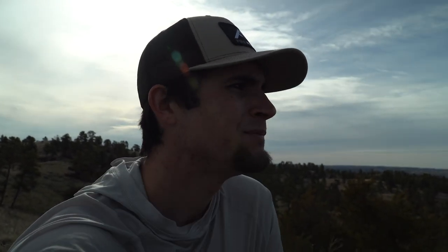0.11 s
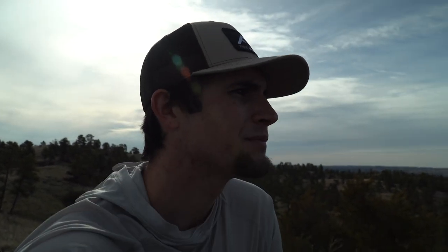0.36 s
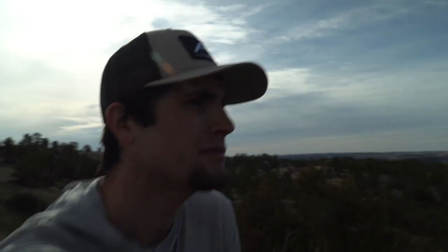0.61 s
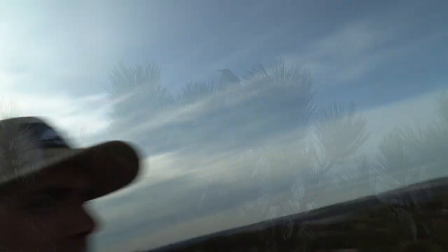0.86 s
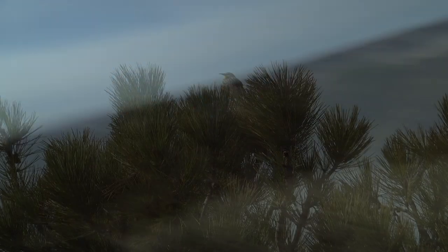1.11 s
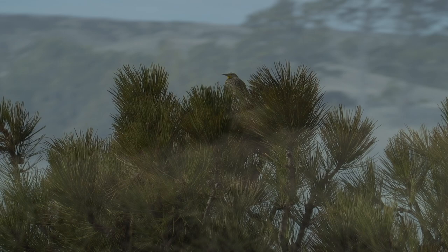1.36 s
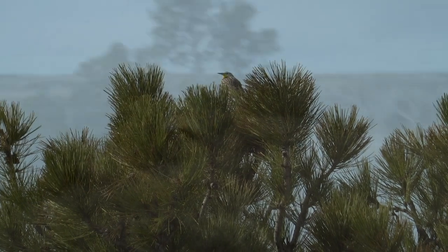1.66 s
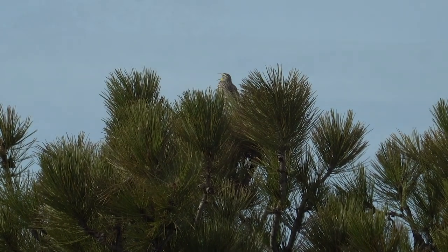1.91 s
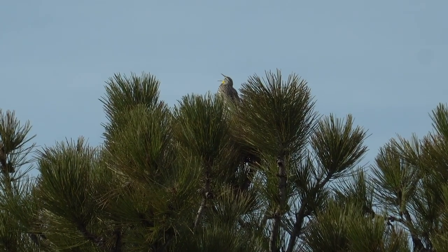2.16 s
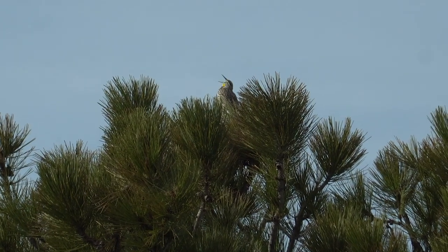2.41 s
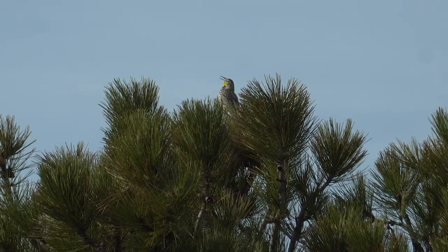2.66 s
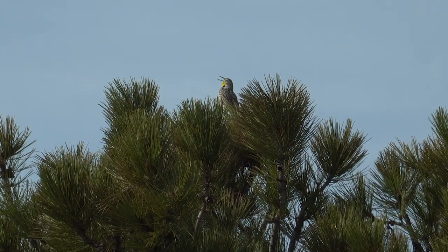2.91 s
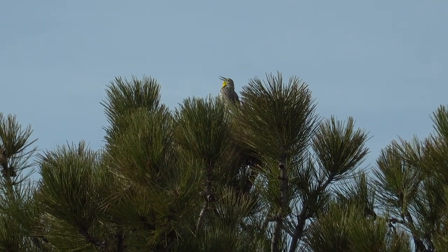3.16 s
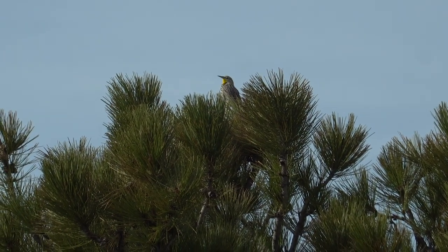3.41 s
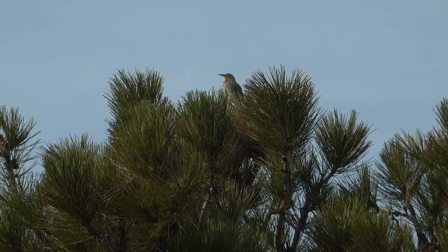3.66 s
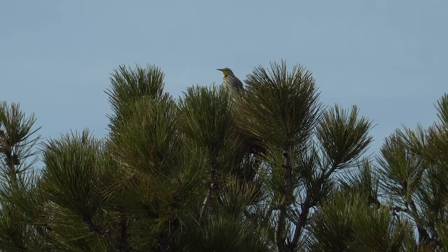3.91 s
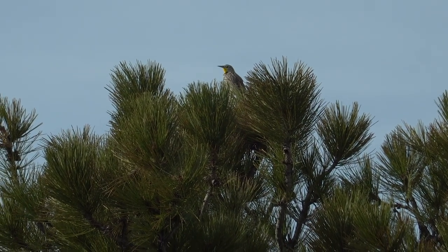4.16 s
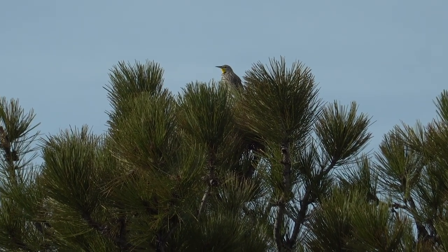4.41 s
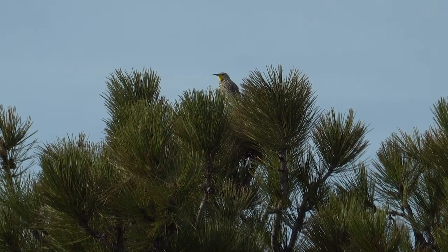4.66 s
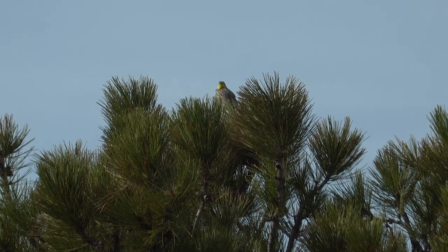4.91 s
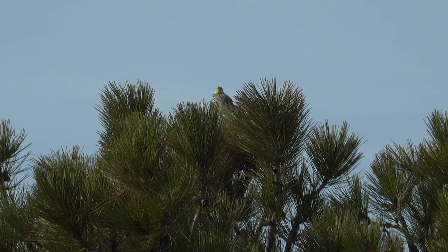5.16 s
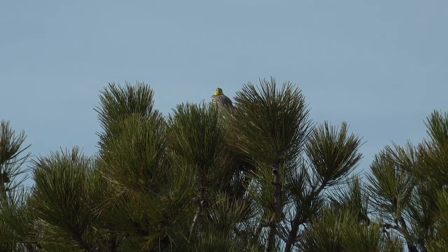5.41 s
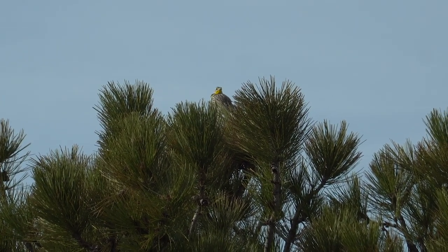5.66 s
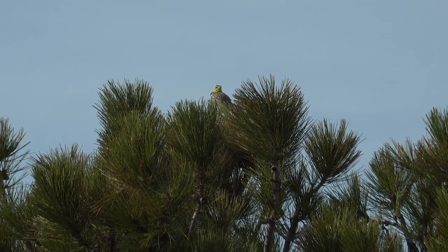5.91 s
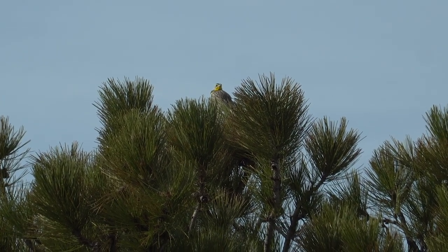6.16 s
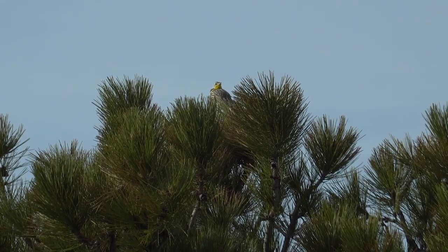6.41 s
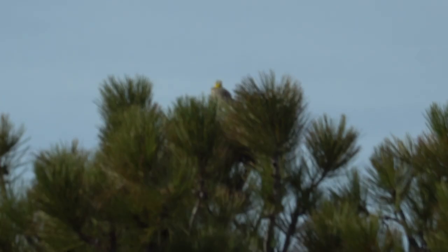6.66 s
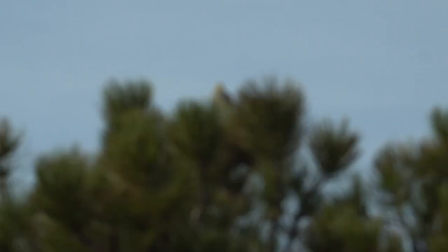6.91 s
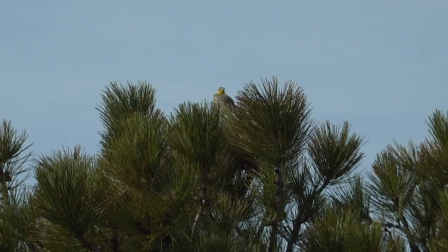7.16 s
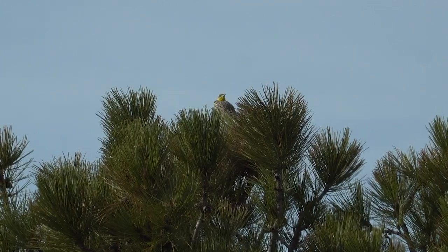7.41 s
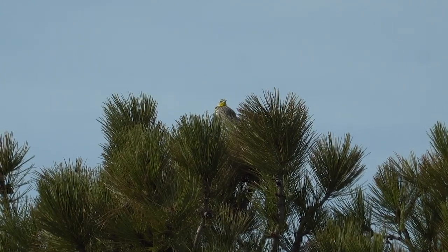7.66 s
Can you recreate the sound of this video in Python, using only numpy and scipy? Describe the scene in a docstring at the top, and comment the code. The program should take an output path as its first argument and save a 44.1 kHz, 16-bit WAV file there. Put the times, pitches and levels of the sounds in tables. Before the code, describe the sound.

Outdoors in open pine country, cloth swishes close to a hand-held microphone, which is shoved with a low thump and rattle. A hard cut brings a quieter scene. Around two seconds a nearby meadowlark sings a single clear, fluting phrase, ending in gurgling, tumbling notes. Afterwards only faint distant whistles and chirps remain, trailing soft echoes, with light wind rumble, thin air hush and a few tiny ticks and knocks.

```python
"""Meadowlark in open country

A lark near by sings one fluting phrase: near-sine notes with weak partials that gurgle and tumble. Far
birds, gliding sines, whistle behind it and trail echoes of noise. Wind and air are coloured noise. In a
short first scene cloth swishes (grainy noise) and the hand-held recorder is shoved (dying sines and a
rattle); a hard cut leads to a quieter second scene. A few small knocks and ticks ring close by.
"""
import sys
import numpy as np
from scipy import signal
from scipy.fft import rfft, irfft
from scipy.io import wavfile
from scipy.ndimage import uniform_filter1d

SR = 44100
rng = np.random.default_rng(int(sys.argv[2]) if len(sys.argv) > 2 else 0)


def generate_wav(sig):
    """Save sig (samples, or channels by samples) to the path in sys.argv[1] as 16-bit PCM at SR."""
    pcm = np.round(np.clip(np.atleast_2d(sig).T, -1, 1) * 32767).astype(np.int16)
    wavfile.write(sys.argv[1], SR, pcm)


def amplitude_ratio(level_db):
    """Convert a level in decibels to the matching linear amplitude (field) ratio."""
    exponent = np.asarray(level_db, float) / 20
    return 10 ** exponent


N = 343980
T = np.arange(N) / SR   # time of every sample, s
CUT_S = .7657   # the first scene ends here

# rumble of the wind on the microphone: f/Hz, relative level per Hz/dB
WIND_COLOUR = [(3.5, -33), (6.0, 4), (22, 0.5), (38, -16.5), (54, -11), (70, -26), (200, -40.5), (260, -64)]
# strength of the wind, one list a scene: t/s, level/dB before a quick random drift
WIND_LEVEL = [
    [(0, -35), (.41, -35.5), (.76, -29)],
    [(.78, -39.5), (2.0, -38.5), (3.2, -46), (4.2, -42), (6.4, -41), (7.8, -45.5)],
]
# hush of the open air: f/Hz, relative level per Hz/dB
AIR_COLOUR = [(53, -32.5), (90, -7), (136, -5), (379, -8.5), (684, -12.5), (1340, -15.5), (2320, -14.5),
              (4360, -22.5), (15100, -27), (16500, -46)]
AIR_DB = -62.5   # before a slow random drift

# far larks, held notes: start/s, length/s, first f/Hz, last f/Hz, level/dB before fades and twinkle
HELD_NOTES = [(.462, 0.056, 2780, 2860, -56), (.535, 0.036, 2870, 2720, -55.5),
              (.53, 0.058, 1950, 2050, -59.5), (.655, 0.026, 2870, 2730, -50.5),
              (.88, 0.038, 2650, 2600, -61.5), (1.02, .066, 1610, 1276, -61.5),
              (1.162, 0.022, 1640, 1680, -55), (1.18, 0.031, 1950, 1930, -55.5),
              (1.21, 0.1, 2058, 1890, -61.5), (1.28, 0.082, 2120, 2027, -52),
              (1.468, 0.024, 2010, 1880, -56.5), (1.56, 0.1, 2150, 1950, -52.5),
              (1.82, .14, 2600, 2340, -48.5), (2.05, 0.06, 3310, 3110, -50.5),
              (2.185, 0.056, 1505, 1550, -59), (2.31, .056, 2280, 2083, -52),
              (2.51, 0.025, 2360, 2190, -48.5), (2.54, 0.078, 1560, 1585, -57),
              (3.49, 0.18, 2034, 2057, -60.5), (3.55, 0.071, 1950, 1777, -54),
              (3.76, 0.1, 3200, 3000, -61.5), (3.83, 0.084, 3720, 3500, -61),
              (3.87, 0.17, 3030, 2930, -66.5), (4.04, 0.027, 2680, 2510, -56.5),
              (4.145, 0.16, 3690, 3520, -68.5), (4.167, .022, 2700, 2480, -56),
              (4.265, 0.3, 2407, 2243, -62.5), (4.475, 0.14, 1600, 1550, -62),
              (4.58, .022, 2760, 2740, -62), (4.92, 0.018, 2460, 2450, -52.5),
              (4.95, .11, 3380, 3356, -57.5), (5.06, 0.089, 2810, 2660, -48.5),
              (5.15, .067, 2170, 2133, -48), (5.37, 0.096, 1783, 1707, -50), (5.44, 0.036, 1945, 2045, -54),
              (5.47, 0.079, 2806, 2590, -49.5), (5.72, .036, 3370, 3070, -58),
              (5.73, 0.112, 2355, 2200, -64), (5.886, 0.026, 2400, 2010, -51.5),
              (5.94, .05, 3900, 2900, -64), (6.05, .08, 1840, 1790, -67.5), (5.94, 0.22, 2036, 1950, -58),
              (6.238, 0.19, 2257, 2240, -50), (6.35, 0.072, 3200, 3000, -70.5),
              (6.52, 0.056, 1990, 1950, -56), (6.62, 0.24, 2580, 2475, -66), (6.63, 0.1, 2340, 2200, -66),
              (6.715, 0.139, 3040, 2716, -59), (7.29, 0.064, 1632, 1595, -63.5),
              (7.335, 0.042, 2535, 2530, -59), (7.44, 0.071, 3270, 3140, -69),
              (7.69, 0.075, 2340, 2196, -60.5)]
FADE_DB = 3.5   # a held note weakens by this much towards its end
# far larks, notes that hold and droop at the end: same columns
DROOPING_NOTES = [(6.45, 0.069, 2055, 1860, -52), (6.82, 0.053, 2150, 1778, -56.5),
                  (6.917, 0.026, 1786, 1550, -57.5), (6.97, .23, 3730, 2850, -69),
                  (7.01, 0.055, 2220, 1880, -58.5)]
# far larks, quick slurs: start/s, first f/Hz, last f/Hz, level/dB before fades and twinkle
QUICK_SLURS = [(.55, 2450, 2050, -41), (.783, 2710, 1700, -56), (1.147, 2600, 1700, -56.5),
               (1.315, 2490, 2800, -65), (1.705, 1420, 1750, -59), (2.119, 4100, 1973, -54.5),
               (2.419, 3560, 2100, -55.5), (2.691, 1601, 2290, -57.5), (2.77, 3270, 2040, -45.5),
               (3.5, 3370, 1990, -53), (3.69, 1830, 2430, -55), (3.731, 3440, 2230, -54.5),
               (3.93, 4050, 2080, -58.5), (4.05, 2446, 1850, -61), (4.074, 3220, 1900, -55),
               (4.097, 3660, 2500, -56), (4.122, 2350, 1500, -65), (4.163, 1800, 2140, -53),
               (4.198, 3070, 1880, -56), (4.335, 2100, 2500, -59.5), (4.4, 1704, 2250, -60),
               (4.46, 1346, 1623, -59.5), (5.655, 3214, 2255, -56.5), (5.845, 3040, 1600, -56.5),
               (6.145, 1550, 1850, -60), (6.165, 1150, 1550, -60), (6.22, 1150, 1600, -64.5),
               (6.745, 1610, 2150, -63), (6.745, 4220, 3770, -61), (7.285, 3700, 2050, -59),
               (7.56, 3600, 2050, -60)]
PLUNGE_HZ_PER_S, RISE_HZ_PER_S = 33000, 14000   # average pace of a slur
CHORUS_PER_S, CHORUS_DB = 45.0, -81   # faintest chirp of the second scene, before fades and twinkle
# a far bird repeats an arched chirp: first t/s, period/s, length/s, foot f/Hz, top f/Hz, level/dB before drift
ARCHED_CHIRP = (5.32, .1455, .044, 2150, 2920, -69)
# a small bird's thin rising whistle: t/s, f/Hz, level/dB, before small random wavers
THIN_NOTE = [(3.65, 6030, -85), (3.7, 6290, -77), (3.81, 6290, -81), (3.89, 7200, -69), (3.98, 7180, -71),
             (4.03, 8340, -84)]

# sound scattered back by trees and slopes: delay/s, level per 10 ms of delay/dB, before clumping
SCATTERED_ECHO = [(.004, -12), (.03, -34.5), (.08, -32), (.14, -34), (.21, -49), (.5, -61)]
VALLEY_T60_S, VALLEY_DB = 1.2, -25   # long echo of the far birds; dB per 10 ms of delay, at its start

# colour of rubbed cloth: f/Hz, relative level per Hz/dB
CLOTH_COLOUR = [(120, -14), (220, -2.5), (330, 0.5), (750, -5.5), (1300, -3), (3100, -3), (5000, -8.5),
                (9300, -9.5), (10000, -19.5), (13600, -12), (16000, -30)]
# strokes of cloth: peak t/s, level/dB, time for the body to fall 20 dB/s, sheen against the body/dB
CLOTH_STROKES = [(0.038, -36, 0.21, 0.5), (.315, -64, 0.1, 12), (.55, -55, 0.33, -11),
                 (.72, -57.5, 0.15, 7)]
SHEEN_STEEPER, STROKE_SHAPE = 1.7, 2.25   # the sheen dies faster than the body; a stroke holds, then lets go
# the hand shoves the recorder: t/s, level at the onset/dB, swing f/Hz
HAND_SHOVES = [(0.697, -14, 42), (0.7283, -12.5, 190), (.74, -13.5, 76), (.743, -10, 5.5), (.763, -18, 215)]
SHOVE_CYCLES = 5.7   # swings in which a shove dies by 60 dB
# knocks on the recorder body: t/s, level/dB, hardness (tilt towards the treble)/dB per octave
BODY_KNOCKS = [(.683, -40.5, 17.5), (1.255, -44, 3), (1.971, -45.5, -18.5), (3.786, -50.5, 2),
               (3.952, -45, 4), (7.097, -51, 7), (7.197, -45, 10)]
# ringing of the recorder body: f/Hz, level against the knock/dB, time to fall 60 dB/s
BODY_MODES = [(223, -3.5, 0.043), (426, -2, 0.042), (620, -6.5, 0.027), (853, -9.5, 0.016)]
# dry ticks: t/s, level/dB
DRY_TICKS = [(.682, -32.5), (2.59, -45), (2.743, -44.5), (3.939, -50.5), (5.308, -54), (5.317, -46.5),
             (5.339, -40), (5.384, -40), (6.802, -51.5), (7.759, -55)]
# ringing of a tick: f/Hz, level against the tick/dB before chance, time to fall 60 dB/s
TICK_RINGING = [(3500, -13.5, 0.0076), (6613, 3, 0.0044), (7670, -11.5, 0.0073), (12330, -19.5, 0.0054)]

# near lark, one list a whistled note: t/s, f/Hz, level/dB, both before gurgles and unsteady breath
SONG_NOTES = [
    [(1.96, 3850, -57), (1.982, 3955, -38), (2.041, 4593, -25), (2.062, 3830, -19.5), (2.071, 3750, -28)],
    [(2.243, 3530, -52), (2.271, 3510, -28.5), (2.299, 3582, -18.5), (2.334, 3628, -20),
     (2.358, 3830, -21.5), (2.369, 3892, -17.5), (2.398, 4007, -29.5), (2.408, 4030, -33)],
    [(2.498, 6660, -38.5), (2.507, 4130, -36.5)],
    [(2.516, 4560, -27), (2.53, 4770, -25.5), (2.541, 4763, -19), (2.561, 3860, -23), (2.572, 3730, -22)],
    [(2.613, 3590, -17), (2.631, 3410, -24), (2.652, 3318, -19.5), (2.71, 3012, -20), (2.75, 2832, -20),
     (2.764, 2854, -25.5)],
    [(2.828, 1680, -42), (2.843, 1832, -22.5), (2.869, 1936, -20)],
    [(2.881, 2584, -19), (2.902, 2470, -19), (2.907, 2340, -20), (2.938, 2280, -23.5), (2.944, 2260, -34),
     (2.951, 2470, -33)],
    [(3.121, 1865, -27.5), (3.132, 1888, -19), (3.175, 1842, -20.5), (3.182, 2113, -32)],
    [(3.196, 1320, -31), (3.211, 1254, -31.5), (3.232, 1312, -41.5), (3.238, 2260, -25), (3.242, 3626, -17),
     (3.26, 3473, -33.5), (3.272, 3535, -34)],
]
ATTACK_DB_PER_S, RELEASE_DB_PER_S, LEAD_IN_S = 5000, 1900, .004   # every note opens and dies by these
# gurgled parts: start t/s, end t/s, flutter/Hz, level depth/0-1, pitch swing/share of the pitch
GURGLED_PARTS = [(2.043, 2.058, 270, 0.5, 0.0094), (2.831, 2.871, 186, 0.2, 0.13),
                 (3.277, 3.298, 290, 0.3, 0.11)]
# dives that rebound into a gurgled fall:
# lowest point t/s, top f/Hz, dive/s, end after the lowest point/s, level at the start of the fall/dB
TUMBLE_NOTES = [(2.973, 6050, .012, .077, -19), (3.285, 5304, 0.0073, 0.048, -20)]
DIVE_TO_HZ, REBOUND_HZ, REBOUND_S, FALL_TO_HZ, FALL_S = 2150, 4540, 0.0051, 1950, .055
TOP_DB, DIVE_DB, BOTTOM_DB, SAG_DB_PER_S = -11, -3.5, -15, 141   # against the start of the fall
# gurgle of the fall: flutter/Hz, level depth/0-1, pitch swing/share of the pitch
TUMBLE_GURGLE = (224, 0.49, .03)
DIVE_RASP = .4   # the voice cracks while it dives: fast random share of the level
CHURN_JITTER = .2   # radians of random slip in the partials while the voice churns
# the windpipe is tuned above the pitch and the octave swells:
# t/s, octave against the fundamental/dB, lead/s, trail/s
REEDY_SPELLS = [(2.04, -30.5, 0.3, .3), (2.42, -18.5, 0.15, 0.38), (2.968, -8, 0.041, 0.048),
                (3.23, 16, 0.033, 0.014), (3.266, -0.5, 0.029, 0.068)]
PURE_DB = -41   # octave of a well tuned note
# higher partials: f/Hz, level against the voice/dB before reediness, churn and chance
UPPER_PARTIALS = [(5500, -51), (7500, -33.5), (8700, -32), (10300, -40.5), (12300, -38), (15500, -47)]
THIRD_DB = 3.5   # extra level of the third partial
CHURN_DB, CHURN_ROUGH_DB = 4, 0.5   # gurgles and dives lift the higher partials and roughen them


def curve(rows, column=1):
    """One column of a table, joined by straight lines in time."""
    rows = np.array(rows)
    return np.interp(T, rows[:, 0], rows[:, column])


def noise(colour):
    """Noise filtered to the given colour, rms 1."""
    hz = np.fft.rfftfreq(N, 1 / SR) + 1   # 1 Hz up, so that the logarithm exists
    table_hz, table_db = np.transpose(colour)
    db = np.interp(np.log(hz), np.log(table_hz), table_db, left=-99, right=-99)
    x = irfft(rfft(rng.standard_normal(N)) * amplitude_ratio(db), N)
    return x / x.std()


def drift(per_s):
    """Random values, per_s of them a second, joined by lines; spread about 1."""
    knots = rng.standard_normal(int(N / SR * per_s) + 2)
    return np.interp(T * per_s, np.arange(len(knots)), knots)


def sine(pitch):
    """Sine of rms 1 that follows a changing pitch by adding up its cycles."""
    return np.sqrt(2) * np.sin(2 * np.pi * np.cumsum(pitch) / SR)


def band(x, order, edges_hz, kind):
    """Keeps one range of frequencies."""
    return signal.sosfilt(signal.butter(order, edges_hz, kind, fs=SR, output="sos"), x)


def ring(s, db, hz, t60):
    """A struck body swings as a decaying sine, set off at time s."""
    age = np.maximum(T - s, 0)
    return amplitude_ratio(db - 60 * age / t60) * np.sin(2 * np.pi * hz * age)


def air():
    """Steady hush: coloured noise with a slow drift of level."""
    return amplitude_ratio(AIR_DB + .5 * drift(1.7)) * noise(AIR_COLOUR)


def wind(first_scene):
    """Light wind rumbles on the microphone: low noise that swells and sinks, with a jump at the cut."""
    level_db = np.where(first_scene, curve(WIND_LEVEL[0]), curve(WIND_LEVEL[1]))
    return amplitude_ratio(level_db + 0.62 * drift(11.0)) * noise(WIND_COLOUR)


def whistles(rows, edge_s, twinkle_db, waver, settle=1.3, fade_db=0):
    """Pure gliding notes, plunges gurgling; the level twinkles on the long way through moving air."""
    out, unsteady = np.zeros(N), 1 + waver * drift(45)
    for start, length, first_hz, last_hz, db in rows:
        at = slice(int(start * SR), min(int((start + length) * SR), N))
        age = T[at] - start
        # settle above 1 glides fastest at first, below 1 fastest at the end
        pitch = last_hz + (first_hz - last_hz) * np.clip(1 - age / length, 0, 1) ** settle
        gain = np.clip(np.minimum(age, length - age) / edge_s, 0, 1)
        gain *= amplitude_ratio(-fade_db * (age / length) ** 2)
        plunge = np.clip((first_hz - last_hz) / length / 30000, 0, 1)   # steeper falls gurgle more
        gain *= 1 + .85 * plunge * np.cos(2 * np.pi * 190 * age)
        out[at] += amplitude_ratio(db) * gain * sine(pitch * unsteady[at])
    return out * amplitude_ratio(twinkle_db * drift(90))


def chorus():
    """Random faint short chirps: most fall in pitch, some rise."""
    draw = rng.random((320, 5))
    start = np.cumsum(-np.log(draw[:, 0])) / CHORUS_PER_S   # random gaps
    first_hz = 1600 + 1500 * draw[:, 1]
    length = 0.014 + 0.015 * draw[:, 3] ** 3
    last_hz = first_hz * np.exp((0.43 * draw[:, 2] - .3) * .03 / length)
    rows = np.c_[start, length, first_hz, last_hz, CHORUS_DB + 8 * draw[:, 4]]
    return whistles(rows[start < N / SR], edge_s=0.0046, twinkle_db=4.5, waver=0.037)


def arched_chirps():
    """A sine goes up and down again in one quick breath, at an even pace."""
    first, period, length, foot_hz, top_hz, db = ARCHED_CHIRP
    progress = np.clip((T - first) % period / length, 0, 1)
    arch = np.sin(np.pi * progress)
    pitch = foot_hz + (top_hz - foot_hz) * np.sqrt(arch.clip(0))
    pitch *= 1 + .03 * drift(12)   # no two are quite alike
    gain = (T > first) * np.clip(4 * arch, 0, 1) * amplitude_ratio(db + 4.5 * drift(7))
    return gain * sine(pitch)


def thin_whistle():
    """A wavering sine high above the larks."""
    on = (T > THIN_NOTE[0][0]) & (T < THIN_NOTE[-1][0])
    pitch = curve(THIN_NOTE) * (1 + 0.00616 * drift(60))
    return on * amplitude_ratio(curve(THIN_NOTE, column=2) + 2.6 * drift(70)) * sine(pitch)


def far_larks():
    """Held notes, drooping notes and slurs; a slur lasts as long as its pace needs."""
    slurs = []
    for start, first_hz, last_hz, db in QUICK_SLURS:
        pace = PLUNGE_HZ_PER_S if first_hz > last_hz else RISE_HZ_PER_S
        slurs.append((start, abs(first_hz - last_hz) / pace, first_hz, last_hz, db))
    out = whistles(HELD_NOTES, edge_s=.008, twinkle_db=3.0, waver=.007, settle=2.3, fade_db=FADE_DB)
    out += whistles(DROOPING_NOTES, edge_s=.005, twinkle_db=2.0, waver=.005, settle=.45)
    return out + whistles(slurs, edge_s=.013, twinkle_db=4.5, waver=.012, settle=1.5)


def landscape(x):
    """Countless small echoes, as noise in clumps, tree by tree; they favour the middle treble."""
    delay = T[:SR // 2]
    envelope = amplitude_ratio(np.interp(delay, *np.transpose(SCATTERED_ECHO), left=-120))
    envelope *= amplitude_ratio(3 * drift(110)[:len(delay)])   # clumps
    echoes = envelope * rng.standard_normal(len(delay)) / np.sqrt(.01 * SR)
    return signal.fftconvolve(band(x, 1, [2500, 6000], "band"), echoes)[:N]


def valley(x):
    """Distant slopes return a long dying blur: echoes of fading noise."""
    delay = T[:SR]
    envelope = amplitude_ratio(VALLEY_DB - 60 * delay / VALLEY_T60_S)
    echoes = envelope * rng.standard_normal(SR) / np.sqrt(.01 * SR)
    return signal.fftconvolve(x, echoes)[:N]


def cloth():
    """Fibres rubbing: grainy noise, strokes dull or bright; a firm stroke makes the weave sing."""
    rub = noise(CLOTH_COLOUR) * amplitude_ratio(1.0 * drift(200))
    body, sheen = np.zeros(N), np.zeros(N)
    for s, db, width, sheen_db in CLOTH_STROKES:
        fall_db = 20 * (abs(T - s) / width) ** STROKE_SHAPE
        body += amplitude_ratio(db - fall_db)
        sheen += amplitude_ratio(db + sheen_db - SHEEN_STEEPER * fall_db)
    weave = band(rub, 2, [4300, 5350], "band")
    firmness = np.clip((20 * np.log10(body + 1e-9) + 54) / 6, 0, 1.7)
    rub = rub + weave * firmness
    low, high = band(rub, 4, 6000, "low"), band(rub, 4, 6000, "high")
    return (body * low + sheen * high) / rub.std()


def handling(first_scene):
    """Shoves and knocks ring with a short noisy rattle, ticks just ring; the cut ends the shoves."""
    out = np.zeros(N)
    grit = noise([(250, 10), (1200, -13), (9000, -22.0)])

    def rattle(s, db):
        """Grit shaken loose: a dying burst of noise."""
        return amplitude_ratio(db - 60 * np.maximum(T - s, 0) / 0.067) * (T > s) * grit

    for s, db, hz in HAND_SHOVES:
        shake = rattle(s, db - 23) * hz / 400   # quick shoves rattle most
        out += (ring(s, db, hz, SHOVE_CYCLES / hz) + shake) * first_scene
    for s, db, hard_db in BODY_KNOCKS:
        for hz, mode_db, t60 in BODY_MODES:
            tilt_db = hard_db * np.log2(hz / BODY_MODES[1][0])   # no tilt at the second mode
            out += ring(s, db + mode_db + tilt_db, hz, t60)
        out += rattle(s, db - 8.5 + 0.3 * hard_db)
    for s, db in DRY_TICKS:
        for hz, mode_db, t60 in TICK_RINGING:
            out += ring(s, db + mode_db + rng.normal(0, 1.6), hz, t60)
    return out


def tumble(bottom, top_hz, dive, end, db):
    """Pitch dives, rebounds and falls; returns rows (t/s, f/Hz, level/dB), one a millisecond."""
    age = np.arange(-dive, end, 1 / 1000)
    down = DIVE_TO_HZ + (top_hz - DIVE_TO_HZ) * np.sin(np.pi / 2 * age / dive) ** 2
    up = DIVE_TO_HZ + (REBOUND_HZ - DIVE_TO_HZ) * np.sin(np.pi / 2 * age / REBOUND_S) ** 2
    fall_left = np.clip(1 - (age - REBOUND_S) / FALL_S, 0, 1)
    fall = FALL_TO_HZ + (REBOUND_HZ - FALL_TO_HZ) * fall_left ** 1.8
    pitch = np.where(age < 0, down, np.where(age < REBOUND_S, up, fall))
    loud = 1.5 * REBOUND_S   # loudest moment
    level_db = np.interp(age, [-dive, -.4 * dive, 0, loud, end],
                         [TOP_DB, DIVE_DB, BOTTOM_DB, 0, -SAG_DB_PER_S * (end - loud)])
    return np.c_[bottom + age, pitch, db + level_db]


def lark():
    """Near-sine whistle with weak partials; gurgles flutter level and pitch together."""
    pitch, level_db = np.zeros(N), np.zeros(N)
    notes = sorted(SONG_NOTES + [tumble(*row) for row in TUMBLE_NOTES], key=lambda note: note[0][0])
    for k, note in enumerate(notes):   # each note takes over shortly before it opens
        start, end = note[0][0], note[-1][0]
        now = (T > start - LEAD_IN_S) | (k == 0)
        edges_db = ATTACK_DB_PER_S * np.maximum(start - T, 0) + RELEASE_DB_PER_S * np.maximum(T - end, 0)
        pitch[now] = curve(note)[now]
        level_db[now] = (curve(note, column=2) - edges_db)[now]
    gain = uniform_filter1d(amplitude_ratio(level_db), size=45)   # rounds the corners

    churn = np.zeros(N)   # 1 where the voice is rough
    gurgles = list(GURGLED_PARTS)
    for s, _, dive, end, _ in TUMBLE_NOTES:
        churn[(T > s - .7 * dive) & (T < s + 2 * REBOUND_S)] = 1
        gurgles.append((s + REBOUND_S, s + end + .01, *TUMBLE_GURGLE))
    gain *= 1 + DIVE_RASP * churn * drift(2500)
    for start, end, per_s, depth, swing in gurgles:
        on = np.clip(np.minimum(T - start, end - T) / 0.0028, 0, 1)
        beat = np.cos(2 * np.pi * per_s * (T - start) + .5 * drift(60))
        beat *= 1 + .2 * drift(140)   # uneven beats
        gain *= 1 + on * depth * (beat - .2)
        pitch *= 1 + on * swing * beat
        churn = np.maximum(churn, on)
    gain *= amplitude_ratio(.5 * drift(150))   # air pressure is never quite even

    phase = 2 * np.pi * np.cumsum(pitch) / SR
    spells = [np.interp(T, [s - lead, s, s + trail], [PURE_DB, db, PURE_DB])
              for s, db, lead, trail in REEDY_SPELLS]
    octave_db = np.max(spells, axis=0)
    voice = np.sin(phase) + amplitude_ratio(octave_db) * np.sin(2 * phase)
    shaken = phase + CHURN_JITTER * (churn + .2) * drift(1400)
    for multiple in range(3, 13):   # the beak passes them by their own height, more so in a reedy tone
        db = np.interp(multiple * pitch, *np.transpose(UPPER_PARTIALS)) + 0.38 * (octave_db + 29.5)
        db += 5.5 * drift(28) + 4 * drift(120)   # each partial comes and goes on its own
        db += THIRD_DB * (multiple == 3) + churn * (CHURN_DB + CHURN_ROUGH_DB * drift(900))
        voice += amplitude_ratio(db) * np.sin(multiple * shaken) * (multiple * pitch < .4 * SR)
    return np.sqrt(2) * gain * voice


def scene():
    """Birds in their landscape, air, wind and handling; far birds carry more echo."""
    first_scene = T < CUT_S
    near = lark()
    far = far_larks() + thin_whistle() + arched_chirps()
    far += chorus() * amplitude_ratio(9 * first_scene)   # the chorus is louder before the cut
    birds = near + far + landscape(near + amplitude_ratio(2.5) * far) + valley(far)
    mix = birds + wind(first_scene) + air() + first_scene * cloth() + handling(first_scene)
    return mix[None]   # one channel


def top_cut(x):
    """Nothing passes above the cut-off."""
    return signal.sosfilt(signal.butter(12, 16640, fs=SR, output="sos"), x)


def record(dry):
    """The finished mix as it is stored."""
    return top_cut(dry)


dry = scene()
out = record(dry)
generate_wav(out)
```